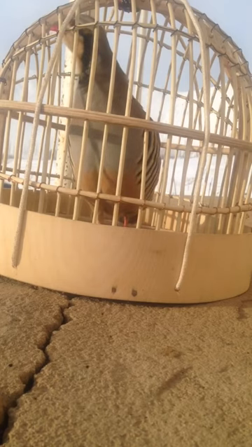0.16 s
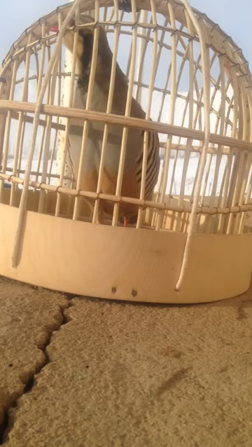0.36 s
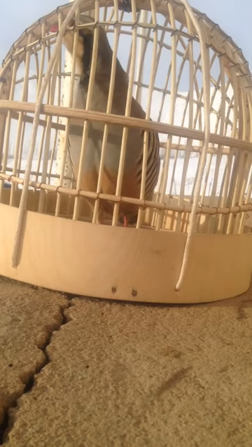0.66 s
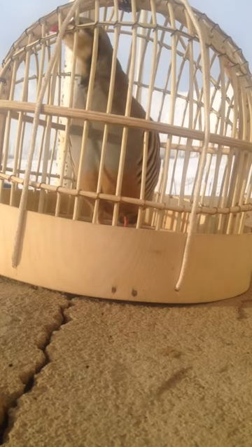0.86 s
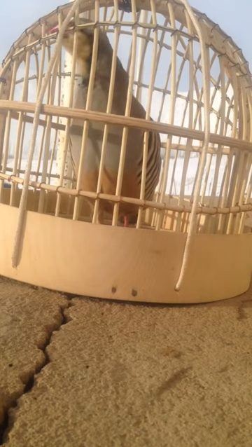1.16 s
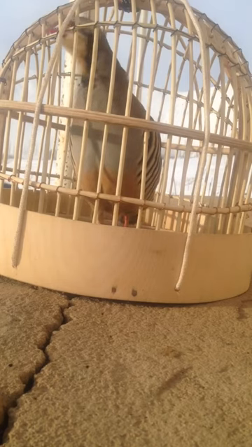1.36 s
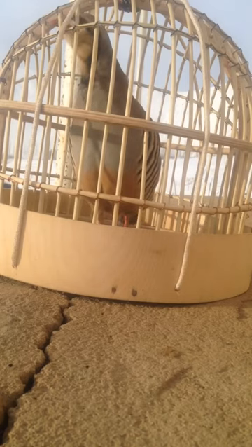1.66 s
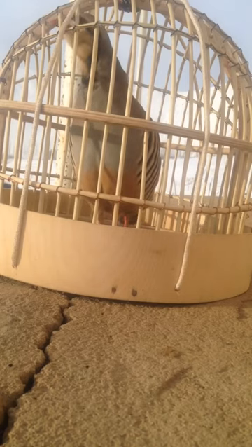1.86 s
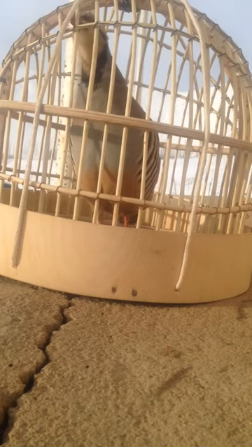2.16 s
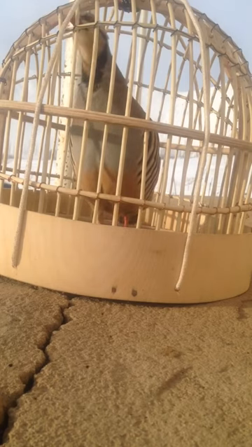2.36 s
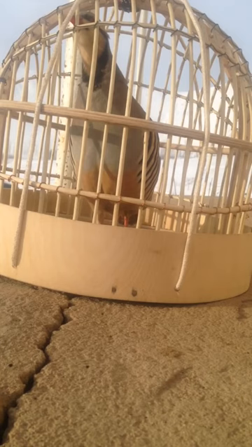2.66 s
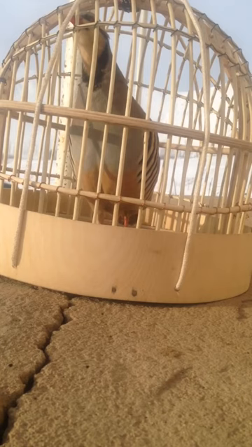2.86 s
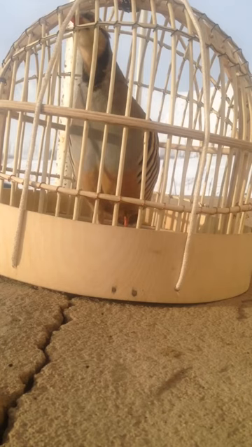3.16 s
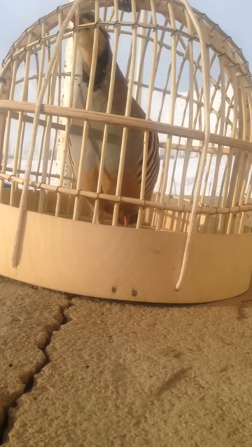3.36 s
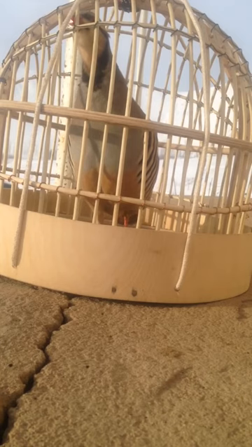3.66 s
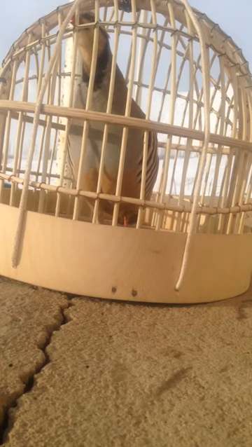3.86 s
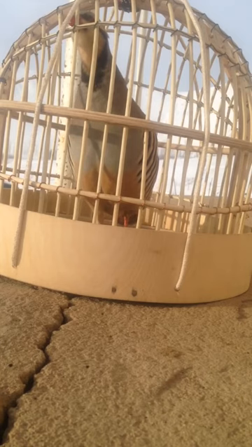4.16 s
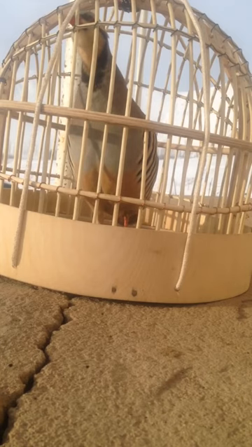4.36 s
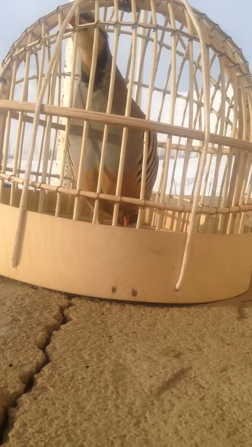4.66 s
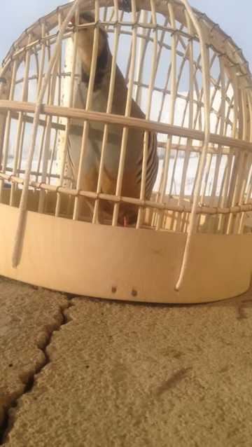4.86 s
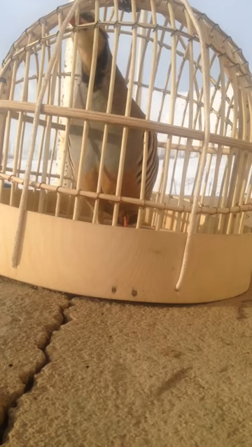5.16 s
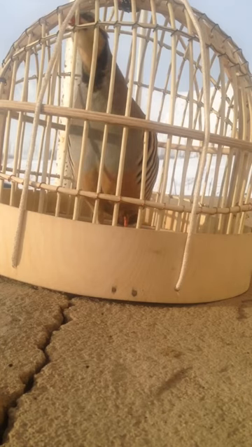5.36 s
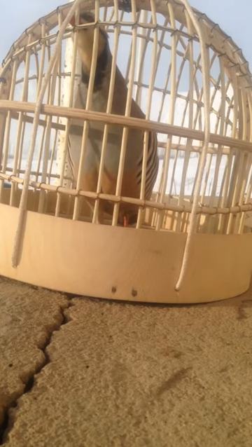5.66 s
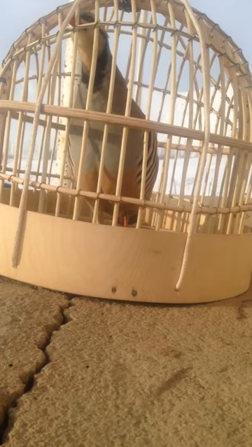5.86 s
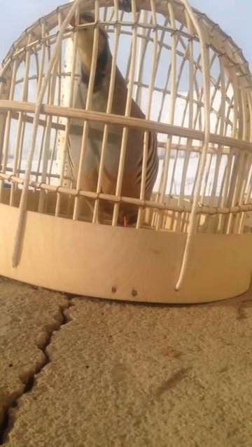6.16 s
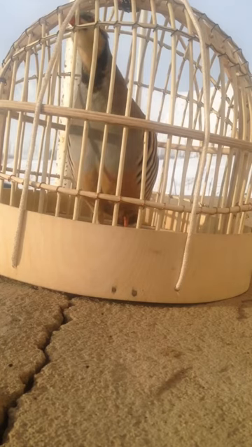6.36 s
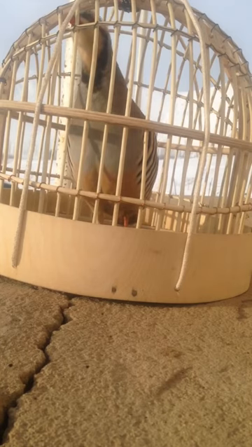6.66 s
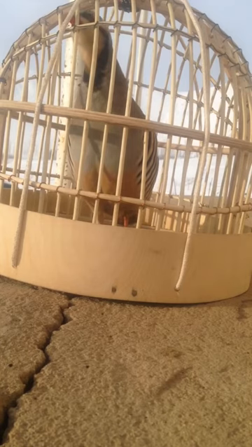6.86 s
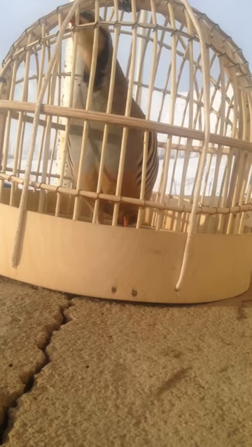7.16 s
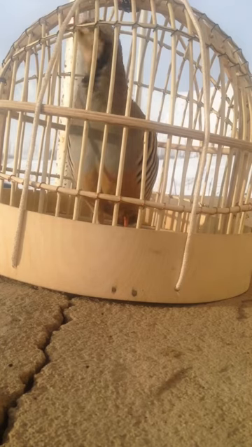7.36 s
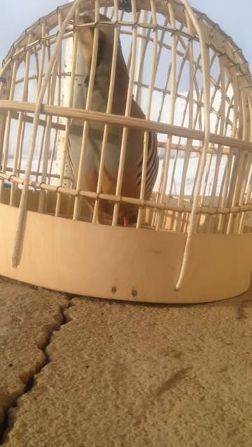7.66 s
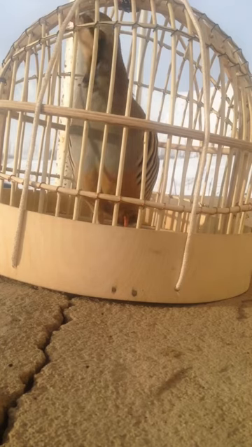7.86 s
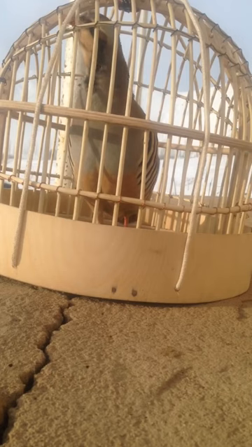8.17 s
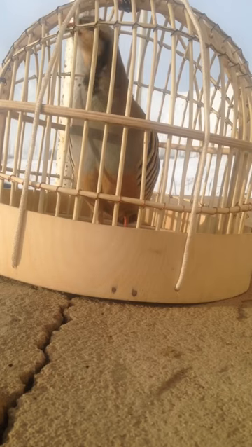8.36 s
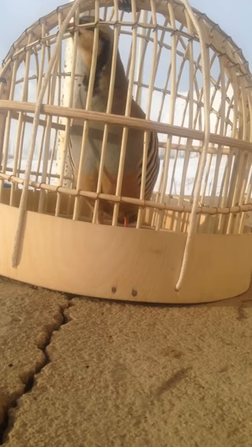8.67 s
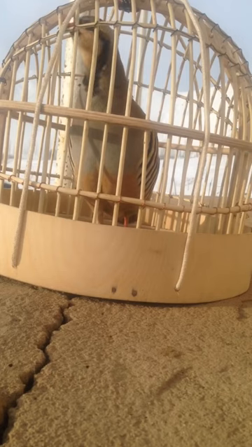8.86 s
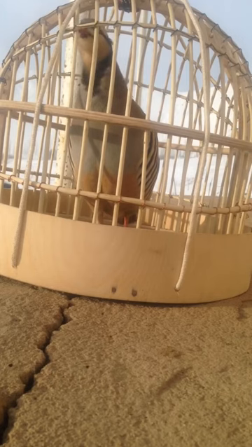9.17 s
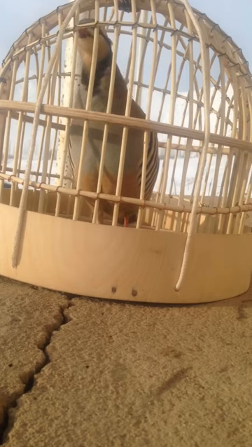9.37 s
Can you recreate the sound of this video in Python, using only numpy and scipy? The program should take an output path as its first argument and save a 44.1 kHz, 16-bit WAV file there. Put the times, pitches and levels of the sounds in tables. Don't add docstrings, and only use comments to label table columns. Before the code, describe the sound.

A caged partridge repeats a harsh, raspy three-note clucking phrase, about twice a second, close up outdoors, over faint hiss.

```python
import sys
import numpy as np
from scipy import signal
from scipy.fft import rfft, irfft, next_fast_len
from scipy.io import wavfile
from scipy.ndimage import uniform_filter1d, map_coordinates

SR = 44100
rng = np.random.default_rng(int(sys.argv[2]) if len(sys.argv) > 2 else 0)


def decibels_to_gain(level_db):
    exponent = np.asarray(level_db, float) / 20
    return 10 ** exponent


def master(y):
    cut = np.clip(np.atleast_2d(y).T, -1, 1)
    pcm = np.round(cut * 32767)
    wavfile.write(sys.argv[1], SR, pcm.astype(np.int16))


N = 419391
LEAD = SR // 5
TIME = np.arange(-LEAD, N) / SR


def unit(x):
    return x / np.sqrt(np.mean(x ** 2) + 1e-20)


def along(points, hz):
    f, v = np.transpose(points)
    return np.interp(np.log(hz + 1), np.log(f + 1), v)


def curves(rows):
    s, *cols = np.transpose(sorted(rows))
    return [np.interp(TIME, s, c) for c in cols]


def wobble(rate_hz):
    knots = rng.standard_normal(int(len(TIME) * rate_hz / SR) + 4)
    return map_coordinates(knots, [np.arange(len(TIME)) * rate_hz / SR])


def noise(spectrum):
    m = next_fast_len(len(TIME))
    colour = decibels_to_gain(along(spectrum, np.fft.rfftfreq(m, 1 / SR)))
    return unit(irfft(rfft(rng.standard_normal(m)) * colour, m)[:len(TIME)])


def gestures():
    # t/s, length/s, level/dB, upper resonance f/Hz
    chucks = [(.159, 0.04, -26.5, 5000), (.614, .039, -25.5, 5200), (1.052, 0.039, -25.5, 5075),
              (1.498, 0.039, -25, 5220), (1.956, 0.04, -25, 4850), (2.422, 0.037, -24, 5123),
              (2.893, .034, -23.5, 5077), (3.352, 0.034, -23.5, 4950), (3.817, 0.039, -25, 4958),
              (4.281, 0.038, -25.5, 5035), (4.758, 0.037, -23, 5050), (5.234, .036, -23.5, 4949),
              (5.708, .038, -23.5, 4893), (6.189, 0.035, -23.5, 4950), (6.667, 0.037, -23, 4895),
              (7.14, 0.036, -23, 4958), (7.619, 0.038, -25.5, 5275), (8.087, 0.038, -26, 5287)]
    # t/s, length/s, level/dB, upper resonance f/Hz, held pitch f/Hz
    clear = [(.346, .041, -27, 4950, 541.2), (.79, 0.039, -25.5, 4830, 564.7),
             (1.227, 0.04, -25.5, 4886, 583.8), (1.678, .043, -25.5, 4796, 561.7),
             (2.142, .039, -25.5, 5065, 568.1), (2.603, 0.035, -25.5, 5041, 558.7),
             (3.074, 0.037, -26, 5108, 558.6), (3.532, 0.04, -24.5, 5065, 567.7),
             (4.001, .039, -25, 4950, 561.5), (4.466, 0.039, -25, 5002, 561),
             (4.945, 0.035, -25, 5069, 562.4), (5.421, 0.039, -24, 4827, 572),
             (5.895, .039, -24.5, 5026, 569), (6.383, 0.036, -25, 5016, 560.6),
             (6.856, .041, -25.5, 4867, 554.5), (7.335, 0.037, -23.5, 4824, 568),
             (7.8, 0.045, -27.5, 4966, 540.6), (8.277, .034, -28, 5070, 540)]
    # t/s, length/s, level/dB, upper resonance f/Hz
    closing = [(-.06, 0.042, -24.5, 4940), (1.746, 0.04, -25.5, 4796), (2.221, 0.031, -25, 5030),
               (2.675, .029, -25.5, 4990), (3.142, 0.037, -24.5, 4925), (3.596, 0.039, -25, 4964),
               (4.069, 0.038, -24, 5010), (4.534, .036, -24, 5016), (5.016, 0.032, -23, 4970),
               (5.493, 0.031, -24, 4910), (5.963, .034, -22.5, 4806), (6.452, 0.033, -23.5, 4800),
               (6.923, 0.037, -24, 4851), (7.404, .034, -24.5, 4884), (7.868, 0.039, -26.5, 5157),
               (8.35, .029, -25, 5170)]
    # t/s, length/s, level/dB, upper resonance f/Hz, held pitch f/Hz
    linked = [
        (.407, 0.039, -26, 5282, 862),
        (.849, 0.039, -27.5, 4970, 558.9),
        (1.291, .043, -26.5, 5080, 555),
    ]
    # t/length, level/dB, pitch ratio, roughness 0-1, beak opening 0-1
    clear_shape = [
        (-.2, -63.5, 3.1, 0.26, .6),
        (-.06, -9.5, 2.9, 0.12, .5),
        (.06, -10.5, 2.75, .3, .5),
        (.11, -3.5, 1.12, 0.51, .6),
        (.33, -1.45, 0.98, 0.11, .8),
        (.65, -2, .98, 0.097, .79),
        (.9, -5.5, 0.89, .17, 0.37),
        (1.1, -11.5, 0.81, .22, .1),
        (1.35, -15.5, .82, 0.26, .05),
    ]
    linked_shape = [
        (-.1, -6, 0.73, 0.089, 0),
        (0.202, -5.5, 1.02, 0.18, 0.33),
        (0.451, 2, 1.06, 0.14, 0.39),
        (.6, 0, 1.05, 0.68, 0.038),
        (1, -10, .75, .55, 0),
        (1.349, -19, .5, 0.28, 0.22),
        (1.501, -58.5, .45, 0.43, 0.11),
    ]
    from_silence = [
        (-.3, -58, 4.7, .02, 1),
        (-.07, -12, 3.4, .01, 1),
        (.09, -9.5, 3.2, .05, 1),
        (.14, -4, 1.3, .45, 1),
    ]
    from_voice = [
        (-.4, -25, 1.3, .3, .1),
        (-.15, -10.5, 1.45, .27, .59),
        (.1, -1.5, 1.3, .4, .77),
    ]
    harsh_body = [
        (.35, 0.5, 1.001, .25, 0.95),
        (.55, -2.05, 1.01, .35, .8),
        (.66, -0.03, 1.25, .46, 0.27),
        (1.001, -10, .85, .53, .03),
        (1.35, -14.5, .55, .4, .01),
        (1.5, -65.5, .48, .47, .14),
    ]
    # base/dB, slope/(dB per kHz of upper resonance above rest)
    bright_by_kind = dict(chuck=(4.8, .3), clear=(4, 8.8), closing=(3.8, 1.5), linked=(5.1, -10.5))
    # t/s, brightness/dB
    zeal = [
        (-.1, -1),
        (1.5, -0.9),
        (2.7, 0.86),
        (4.2, -0.6),
        (6, -0.24),
        (8.4, -2),
    ]
    harsh_hz, rest_hz = 547.7, 5000

    def add_pitch(rows):
        return [(*row, harsh_hz) for row in rows]

    def brightness_db(kind, s, upper_hz):
        base_db, db_per_khz = bright_by_kind[kind]
        return base_db + db_per_khz * (upper_hz - rest_hz) / 1000 + np.interp(s, *np.transpose(zeal))

    kinds = dict(chuck=(add_pitch(chucks), from_silence + harsh_body),
                 clear=(clear, clear_shape),
                 closing=(add_pitch(closing), from_voice + harsh_body),
                 linked=(linked, linked_shape))
    song = []
    for kind, (rows, shape) in kinds.items():
        for s, length, db, upper_hz, hz in rows:
            bright_db = brightness_db(kind, s, upper_hz)
            song.append([(s + share * length, db + effort, bright_db + 0.36 * effort,
                          hz * ratio, rough, beak, upper_hz)
                         for share, effort, ratio, rough, beak in shape])
    song.sort()
    ends = [note[0][0] for note in song[1:]] + [np.inf]
    return curves([point for note, end in zip(song, ends) for point in note if point[0] < end])


def syrinx(pitch, rough):
    jitter = rough * (.1 * wobble(120) + .08 * wobble(500))
    cycles = np.cumsum(pitch * np.exp(np.clip(jitter, -.7, .7))) / SR
    whole = np.arange(1, int(cycles[-1]) - 20)
    at = np.interp(whole, cycles, np.arange(len(TIME)))
    size = decibels_to_gain(7.5 * rough[at.astype(int)] * rng.uniform(-1.8, 1, len(at)))
    spots = at.astype(int)[:, None] + np.arange(-7, 9)
    away = spots - at[:, None]
    kernel = size[:, None] * np.sinc(away) * np.cos(np.pi * away / 16) ** 2
    pulses = np.bincount(spots.ravel(), kernel.ravel(), len(TIME))
    puff = np.exp(-2.5 * (cycles % 1)) * rng.standard_normal(len(TIME))
    return np.sqrt(SR / pitch) * pulses / decibels_to_gain(0.68 * rough), puff, np.sin(2 * np.pi * cycles)


def ring(x, modes, size=4096):
    # f/Hz, width/Hz, level/dB
    hollows = [(1150, 300, -9), (3387, 833, -19), (4070, 1200, -5), (6590, 1000, -12.5), (9240, 300, -6.5)]
    hz = np.fft.rfftfreq(size, 1 / SR)
    power = sum(decibels_to_gain(db) ** 2 / (1 + (2 * (hz - c) / w) ** 2) ** 2 for c, w, db in modes)
    hollow_db = sum(db * np.exp(-(2 * (hz - c) / w) ** 2) for c, w, db in hollows)
    power = power * decibels_to_gain(2 * hollow_db) / (1 + (480 / (hz + 1)) ** 8)
    cepstrum = irfft(np.log(power + 1e-10) / 2)
    cepstrum[1:size // 2] *= 2
    cepstrum[size // 2 + 1:] = 0
    return signal.fftconvolve(x, irfft(np.exp(rfft(cepstrum))))[:len(x)]


def partridge():
    # f/Hz, width/Hz, level/dB
    open_pipe = [(1672, 290, -3.5)]
    closed_pipe = [(1506, 525, -1)]
    throat = [(677, 830, -21), (2110, 210, -11.5), (2688, 1010, -10.5)]
    long_neck = [(4738, 380, 1), (5026, 337, 0.5)]
    short_neck = [(5090, 555, 0.5), (5364, 430, -3)]
    beak_bands = [(7690, 1300, 2), (10370, 1500, 0.5), (11440, 970, -4), (13620, 5160, -1.5)]
    level_db, bright_db, pitch, rough, beak, upper_hz = gestures()
    rough, beak = np.clip(rough, 0, 1), np.clip(beak, 0, 1)
    short = np.clip((upper_hz - 4800) / 420 + .5 * (beak - .6), 0, 1)
    pulses, puff, swing = syrinx(pitch, rough)

    breath = decibels_to_gain(level_db + 4 * rough * np.tanh(wobble(200)))
    flow = breath * (pulses + (.04 + 1.6 * rough ** 2) * puff)
    low = ring(flow * beak, open_pipe) + ring(flow * (1 - beak), closed_pipe)
    low = low + ring(flow * decibels_to_gain(0.46 * bright_db), throat)

    smooth_breath = uniform_filter1d(breath, size=221, origin=100)
    chest = decibels_to_gain(-10 - 10 * rough) * smooth_breath * swing / (1 + (pitch / 850) ** 8)

    bright = breath * decibels_to_gain(bright_db) * (pulses + (0.079 + 4 * rough ** 2) * puff) / (1 + 2 * rough ** 2)
    high = ring(bright * np.sqrt(short), short_neck) + ring(bright * np.sqrt(1 - short), long_neck)

    air = decibels_to_gain(level_db + .5 * bright_db) * (.5 * pulses / (1 + 6 * rough) + 1.944 * puff)
    hiss = sum(decibels_to_gain(2.3 * np.tanh(wobble(12))) * ring(air, [mode]) for mode in beak_bands)
    return decibels_to_gain(20.5) * low + chest + decibels_to_gain(17.0) * high + decibels_to_gain(-3) * hiss


def cage(x):
    # delay/ms, level/dB
    echoes = [(.45, -10), (.9, -11), (1.5, -12), (2.3, -13), (3.4, -14), (5.2, -16)]

    def late(ms):
        return np.pad(x, (round(ms * SR / 1000), 0))[:len(x)]

    return x + sum(decibels_to_gain(db) * np.tanh(wobble(6)) * late(ms) for ms, db in echoes)


def walls(x):
    # f/Hz, t60/s
    near_t60 = [(300, 0.056), (1000, 0.22), (1450, 0.18), (2000, 0.13), (2800, 0.08), (5000, 0.099),
                (12000, 0.058)]
    # f/Hz, width/Hz, t60/s, level/dB
    far_wall = (1500, 230, 1.0, -27.5)
    far_hz, width_hz, far_t60_s, far_db = far_wall
    wet, turn = 0, wobble(5)
    for share in (np.cos(2 * turn), np.sin(2 * turn)):
        hz, t, z = signal.stft(rng.standard_normal(SR // 2), SR, nperseg=256)
        near = decibels_to_gain(-60 * t / along(near_t60, hz)[:, None])
        far = decibels_to_gain(far_db - 60 * t / far_t60_s) * np.exp(-((hz[:, None] - far_hz) / width_hz) ** 2)
        tail = signal.istft(z * (near + far), SR, nperseg=256)[1]
        tail = tail / np.linalg.norm(tail)
        wet = wet + signal.fftconvolve(np.pad(x * share, (400, 0)), tail)[:len(x)]
    return wet


def tone(rows, orders, unsteady):
    hz, db = curves(rows)
    fade = np.clip(np.minimum(TIME - rows[0][0], rows[-1][0] - TIME) / .02, 0, 1)
    phase = 2 * np.pi * np.cumsum(hz * (1 + unsteady * wobble(54))) / SR
    partials = sum(decibels_to_gain(g) * np.sin(k * phase) for k, g in orders)
    return fade * decibels_to_gain(db + 3.0 + 3.3 * wobble(44)) * partials


def hinge():
    # t/s, length/s, f/Hz, glide/(Hz/s), level/dB
    squeak_rows = [(.51, .11, 3280, 150, -76), (.52, .1, 6600, 100, -79), (.67, .11, 6880, 900, -68),
                   (.92, .31, 8190, -350, -59), (1.26, .24, 8020, -1000, -67), (1.52, .17, 7680, -400, -72),
                   (1.1, .14, 2990, 700, -60), (1.43, .09, 2610, 500, -78), (1.43, .26, 5620, -400, -63),
                   (1.7, .25, 5520, -60, -69), (1.54, .14, 11300, -2500, -70), (1.82, .15, 2750, 100, -72),
                   (2.96, .13, 3220, -150, -68), (3.195, .14, 3200, -150, -68)]
    # t/s, slip rate f/Hz, level/dB
    groan = [
        (.8, 213.2, -100),
        (.95, 213, -81),
        (1.15, 203, -87),
        (1.4, 213.3, -81.5),
        (1.7, 210, -78),
        (1.95, 201.3, -84),
        (2.3, 203.1, -84),
        (2.7, 190, -100),
    ]
    # multiple, level/dB
    groan_orders = [(1, -1.5), (2, -3.5), (3, -4.5), (4, 0)]
    # t/length, drop/dB
    course = [(0, 9), (.3, 0), (.6, 0), (1, 9)]
    out = tone(groan, groan_orders, 0.033)
    for s, length, hz, glide, db in squeak_rows:
        rows = [(s + u * length, hz + glide * u * length, db - drop_db) for u, drop_db in course]
        out = out + tone(rows, [(1, 0)], 0.0048)
    return out


def wind():
    # t/s, peak level/dB
    gust_rows = [
        (.33, -73),
        (1.52, -76),
        (1.74, -64.5),
        (2.43, -73.5),
        (3.36, -69),
        (3.66, -57),
        (5.3, -83.5),
        (7.35, -81),
    ]
    # f/Hz, level/(dB per Hz)
    buffet = [(25, -30.5), (50, -4.5), (110, -1.5), (220, -6), (400, -48)]
    calm_db, rise_db_per_s, fall_db_per_s = -88.5, 220.5, 108.5
    level = decibels_to_gain(calm_db)
    for s, db in gust_rows:
        drop_db = np.where(TIME < s, rise_db_per_s * (s - TIME), fall_db_per_s * (TIME - s))
        level = level + decibels_to_gain(db - drop_db)
    return level * decibels_to_gain(1.6 * wobble(12) - 8.5) * noise(buffet)


def traffic():
    # f/Hz, level/(dB per Hz)
    rumble = [(18, -47), (30, -27), (42, -10), (78, 0), (105, -10.5), (140, -4), (175, -24), (260, -70.5)]
    return decibels_to_gain(-88 + 2.5 * wobble(1.5)) * noise(rumble)


def microphone_hiss():
    # f/Hz, level/(dB per Hz)
    hiss = [(18, -50.5), (105, -22), (172, -12.5), (452, -9), (1600, -15.5), (5250, -10), (7500, -11.5),
            (15300, -14)]
    return decibels_to_gain(-70) * noise(hiss)


def scene():
    bird = cage(partridge())
    mix = bird + decibels_to_gain(-18.0) * walls(bird) + hinge() + wind() + traffic() + microphone_hiss()
    return mix[None, LEAD:]


def low_pass(x):
    return signal.sosfilt(signal.butter(12, 16470, fs=SR, output="sos"), x)


def record(dry):
    # f/Hz, level/dB
    response = [(14300, 2), (15200, -9.5), (15800, -33), (16500, -50)]
    m = next_fast_len(N)
    gain = decibels_to_gain(along(response, np.fft.rfftfreq(m, 1 / SR)))
    heard = irfft(rfft(dry, m) * gain, m)[:, :N]
    return low_pass(heard)


dry = scene()
out = record(dry)
master(out)
```